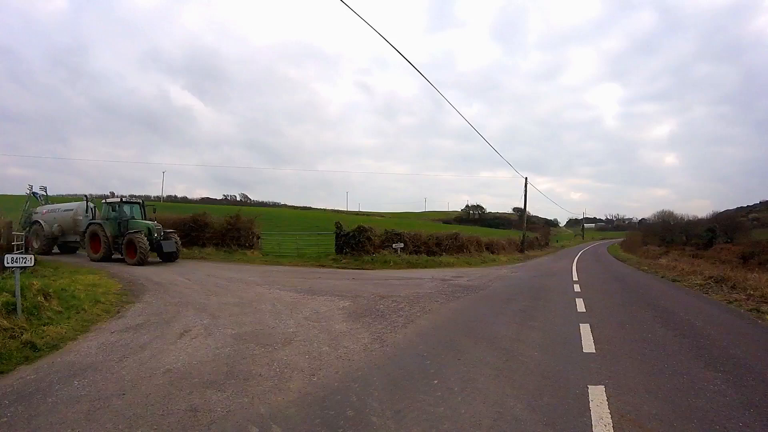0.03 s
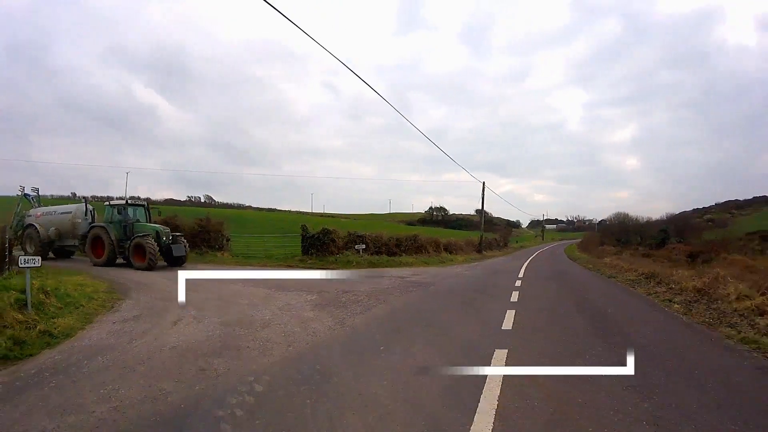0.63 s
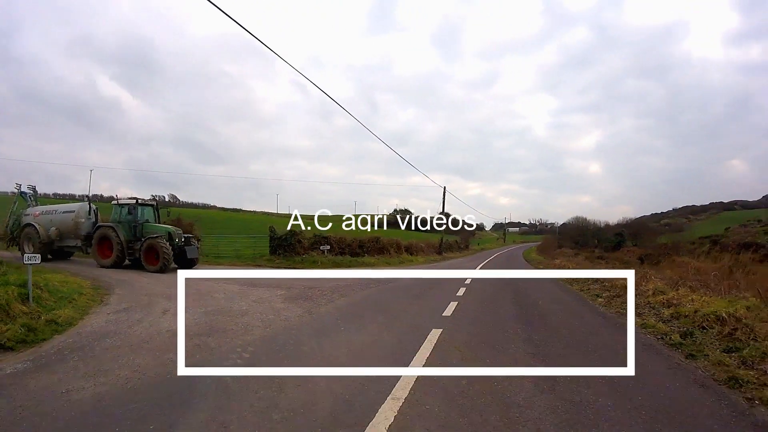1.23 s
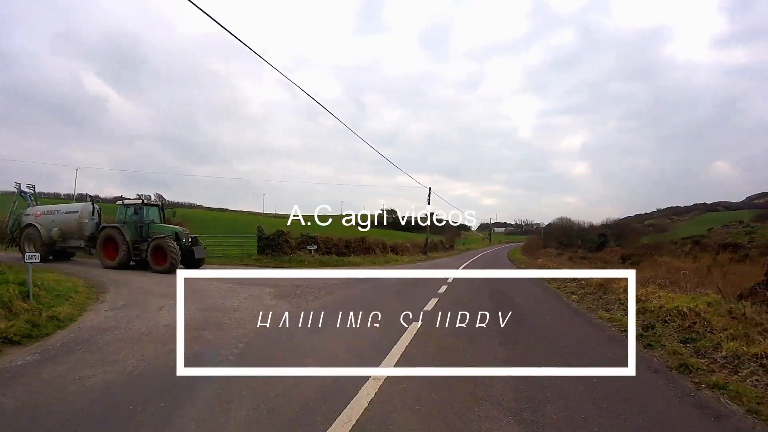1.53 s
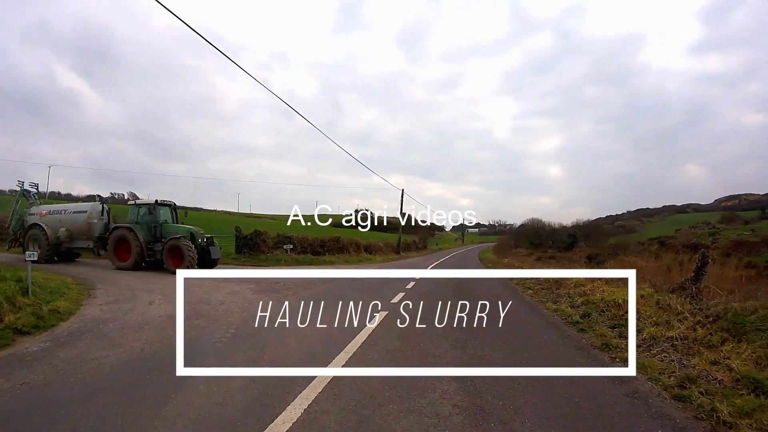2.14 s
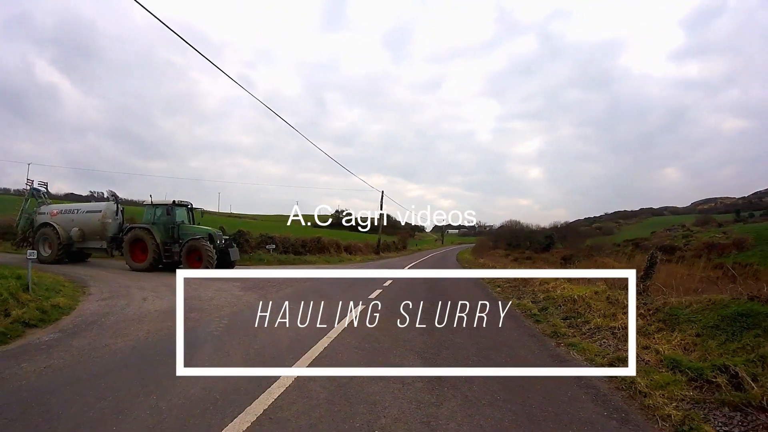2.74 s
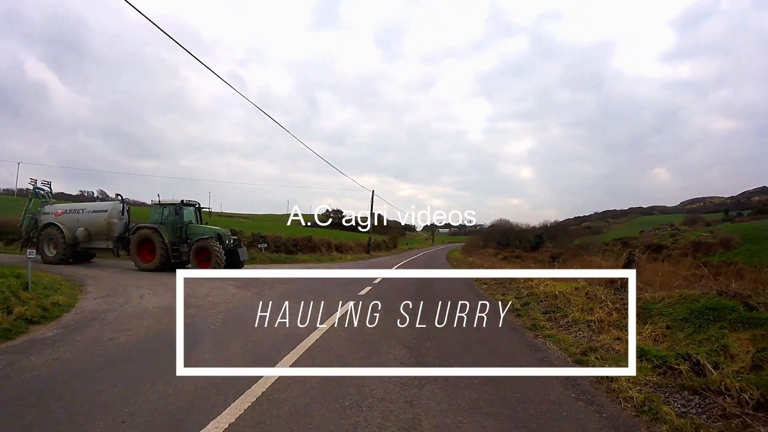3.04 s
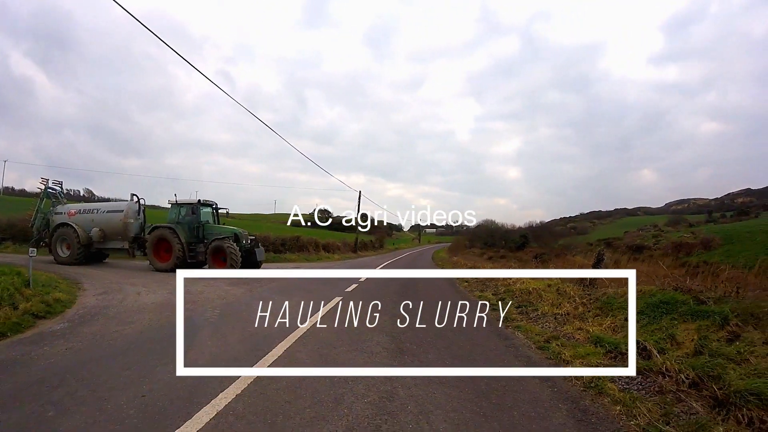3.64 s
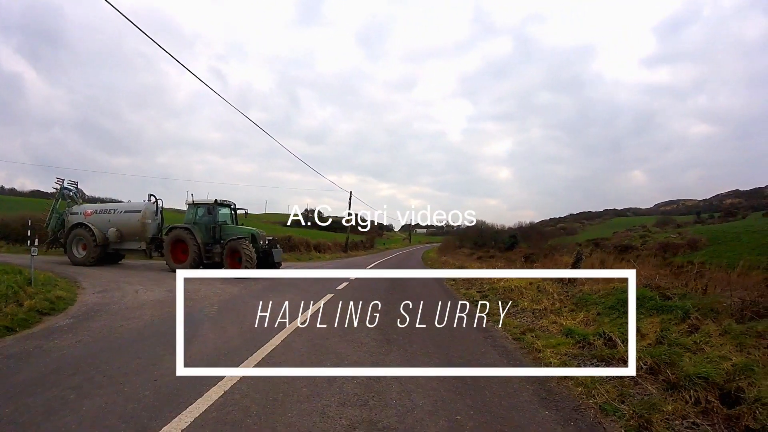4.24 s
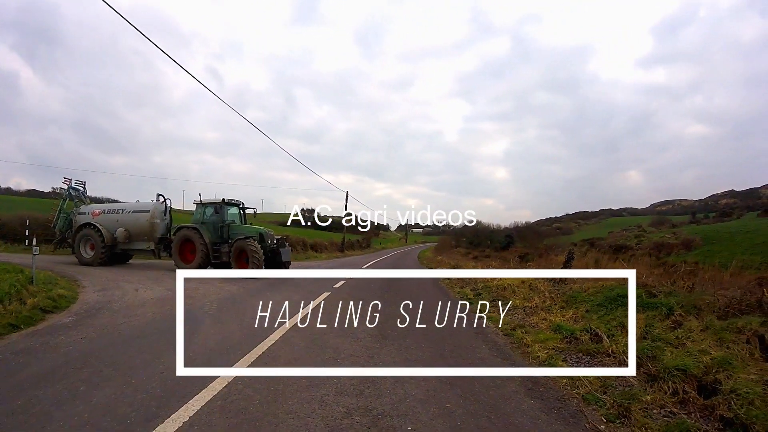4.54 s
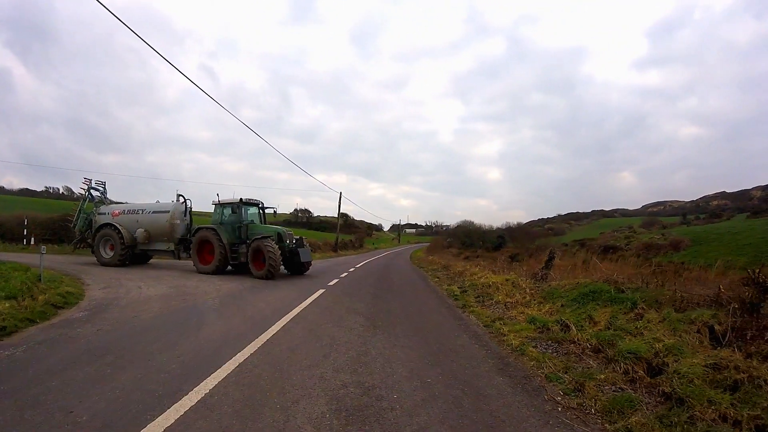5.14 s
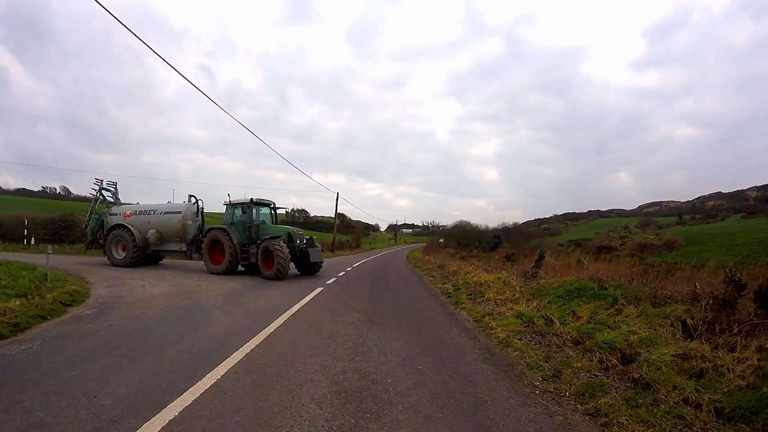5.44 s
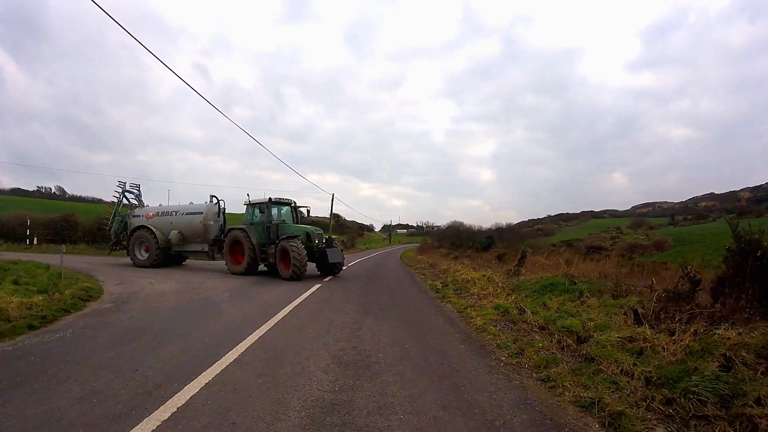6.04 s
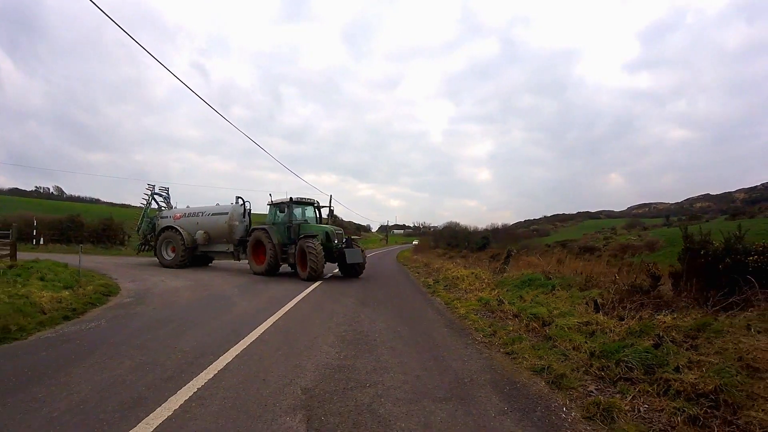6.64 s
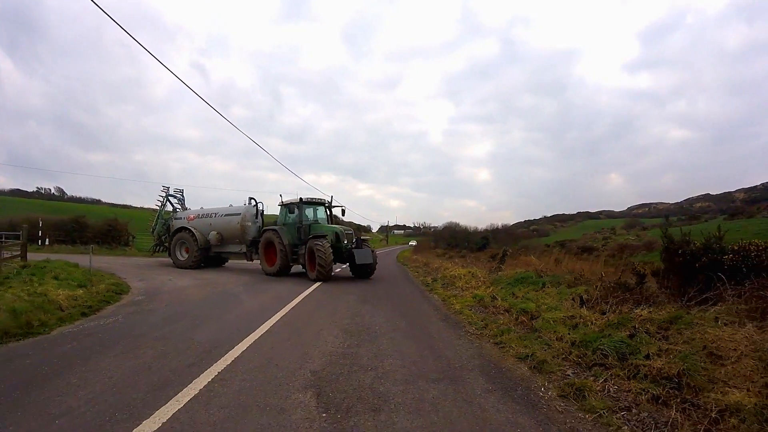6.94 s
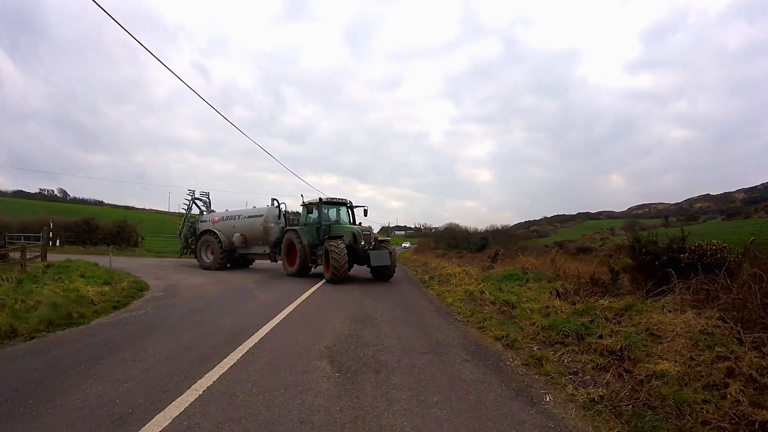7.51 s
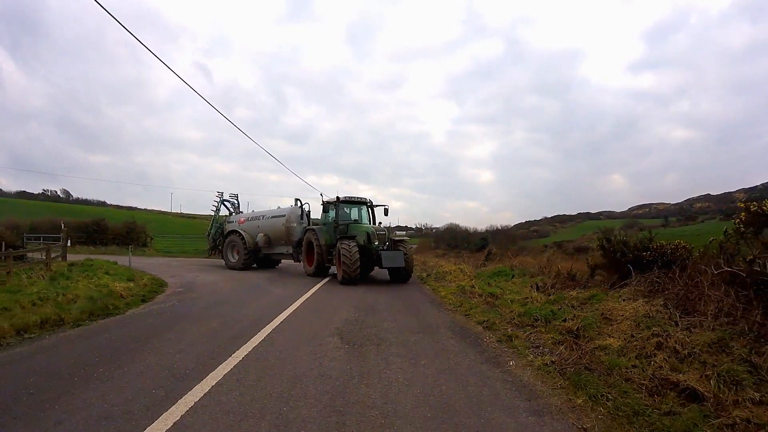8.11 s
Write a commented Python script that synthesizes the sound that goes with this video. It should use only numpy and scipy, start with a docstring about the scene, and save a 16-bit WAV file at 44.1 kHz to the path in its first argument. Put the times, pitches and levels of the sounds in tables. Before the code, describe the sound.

A diesel tractor towing a tank runs near the microphone at a country junction, with low wind buffeting throughout, gustier from about 2 seconds. At first the engine knocks and rumbles over rolling tyres and a hum that sinks in pitch and dies away by 4 seconds. Loose steel fittings clink on the tank from about 0.5 to 4.7 seconds. The tractor is quietest near 3.7 seconds, then takes up the load, with a thin, pulsing turbo whistle that rises around 5 seconds and fades. A sharp, dry knock and a wind boom come at about 5.4 seconds. The engine picks up speed and pulls with a throbbing drone from its panels, while the tyres crunch on grit and crack small stones. Another gust booms near 7 seconds, and the tractor eases slightly in level towards the end, just after 8 seconds.

```python
"""Tractor and tank at a country junction

A diesel tractor towing a tank slows, then pulls out, heard at one nearby microphone.
Its drive hum sinks; firings knock the block, set panels droning and pulse the turbo's whistle.
Tyres roar and crunch on grit, and loose steel fittings clink on the tank.
Closest of all, wind buffets the microphone throughout."""
import sys
import numpy as np
from scipy import signal
from scipy.fft import rfft, irfft, next_fast_len
from scipy.io import wavfile
from scipy.ndimage import uniform_filter1d, minimum_filter1d

SR = 44100
rng = np.random.default_rng(int(sys.argv[2]) if len(sys.argv) > 2 else 0)


def digitize_waveform(pressure):
    """Quantize a signal to 16-bit integers and store it at the path in sys.argv[1].

    Rows of a 2-D input are taken as channels; values are limited to [-1, 1].
    """
    field = np.atleast_2d(pressure).T
    bounded = np.clip(field, -1, 1)
    quanta = np.round(bounded * 32767).astype(np.int16)
    wavfile.write(sys.argv[1], SR, quanta)


N = 364707
TIME = np.arange(N) / SR

# how loud the rig is at the microphone: (time [s], level [dB])
RIG_LEVEL = [(0.1, -32.5), (1.9, -33), (2.5, -34.5), (2.7, -37.5), (3.4, -36.5), (3.66, -38), (3.71, -44.5),
             (3.92, -38.5), (4.3, -34), (4.75, -30.5), (4.95, -35.5), (5.35, -32.5), (6.4, -29.5),
             (6.8, -31.5), (7.7, -33.5), (8.25, -36)]
# the engine slowing and picking up: (time [s], firing rate [Hz], load [0-1])
ENGINE_RUN = [(0, 39.76, 0.37), (1.6, 37.84, 0.25), (2.8, 35.27, 0.41), (3.7, 33.67, 0.28),
              (4.1, 33.28, 0.7), (4.4, 32.27, 1), (4.9, 33.7, 0), (5.15, 35.69, 0.9), (5.45, 37.96, 0.6),
              (5.75, 40.02, 0.8), (6.25, 40.61, 0.85), (6.9, 40.16, 0.66), (8.27, 40.34, 0.85)]
# resonances of block, injectors and valves, and fittings: (frequency [Hz], width [Hz], gain [dB])
BLOCK_MODES = [(351, 41, -3.5), (692, 60, -4), (760, 250, -18.5), (978, 230, -8.5), (1119, 18, -3),
               (1220, 35, -0.5), (1438, 300, -7)]
VALVE_MODES = [(2850, 180, 1), (3680, 490, -0.5), (4930, 180, -3), (7000, 270, -18)]
STEEL_MODES = [(3795, 45, 0), (4140, 100, -5.5), (5830, 170, -4), (6200, 270, -7), (6740, 110, -0.5),
               (7700, 480, -7.5), (9050, 280, -9), (11700, 2200, -9.5)]
# exhaust note, and tones of the pulling engine: (multiple of firing rate [ratio], relative level [dB])
EXHAUST_TONES = [(2, -26.5), (3, -29.5), (4, -37), (5, -40.5), (6, -40.5), (7, -44), (8, -48), (9, -46),
                 (11, -48), (17, -60.5)]
PULL_TONES = [(7, -19.5), (24, -4.5), (27, -16), (32, -3)]
# the silencer's two strongest surges: (time [s], length [s], level [dB])
SILENCER_SURGES = [(6.004, 0.046, -40), (6.828, 0.04, -31)]
# turbo whistle and drive-line hum: (time [s], frequency [Hz], level [dB])
TURBO_WHISTLE = [(3.45, 3660, -67), (3.7, 3590, -65.5), (4.05, 3558, -60), (4.35, 3606, -51),
                 (4.6, 3600, -48), (4.87, 3680, -51.5), (5.02, 3840, -60), (5.2, 4040, -57),
                 (5.42, 4170, -49), (5.56, 4350, -60), (6.7, 5450, -70), (7.1, 5500, -68),
                 (7.65, 5490, -64), (8.0, 5500, -68)]
DRIVE_HUM = [(0, 216.4, -28), (1.25, 209.5, -28.5), (1.55, 205, -26), (2.45, 202.5, -25), (2.8, 189, -40),
             (3.2, 178.6, -29), (3.9, 174, -55)]
# tones of that hum: (multiple of hum frequency [ratio], relative level [dB])
HUM_TONES = [(0.125, 2), (.25, 2), (0.563, -13.5), (.76, -19), (1, -1.5)]
# road speed, as the tyre lugs meet the road: (time [s], lug rate [Hz])
LUG_RATE = [(0, 560), (2.05, 426.5), (3.25, 348), (3.9, 323.5), (5.2, 312.4), (6.2, 342.3), (8.27, 352)]
# swells of the lugs' tone: (time [s], length [s], level [dB])
LUG_SWELLS = [(0.999, 0.83, -42.5), (2.267, 0.98, -39.5), (3.22, 0.28, -38), (6.043, 1.05, -34),
              (7.75, 0.51, -37.5)]
# loose grit under the tyres: (time [s], amount [0-1])
GRIT_COVER = [(3.65, 0.23), (3.72, 0.05), (4.3, 0.27), (5.24, 0.5), (5.32, 0.8), (5.7, 0.89), (6.85, 0.88),
              (7.1, 0.72), (8.27, 0.56)]
# stones cracking under the treads: (time [s], relative crack level [dB], relative spray level [dB])
STONE_CRUSHES = [(5.5864, -35, -46), (5.673, -36, -42.5), (5.77, -41, -52), (5.82, -49, -56),
                 (5.9908, -34, -47), (6.098, -38, -44), (6.139, -31, -51), (6.2159, -32.5, -46),
                 (6.2377, -33, -55), (6.336, -40, -44), (6.3617, -35, -50), (6.4161, -33, -46),
                 (6.464, -43, -49), (6.535, -35, -46), (6.5595, -30, -60), (6.7129, -42, -48),
                 (6.7845, -43, -50), (6.8818, -32, -44), (7.1554, -39, -52), (7.431, -35, -49),
                 (7.553, -41, -53), (7.597, -36, -60), (7.697, -34.5, -50), (7.787, -44, -58),
                 (8.015, -38, -56)]
# the loudest knocks: (time [s], level [dB])
HARD_KNOCKS = [(3.3653, -47), (3.3905, -48), (5.377, -25), (5.4316, -35)]
# fittings clinking on the tank: (time [s], relative chatter level [dB], relative ring level [dB])
TANK_CLINKS = [(0.5302, -49, -60), (0.6075, -45, -58), (0.6853, -45, -61), (0.835, -43, -51),
               (0.9058, -46, -58), (0.9847, -41, -59), (1.0585, -42, -55), (1.412, -42, -49),
               (1.4551, -42, -57), (1.497, -45, -55), (1.5653, -46, -47), (1.6467, -42, -46),
               (1.6801, -41, -45), (1.7364, -43, -53), (1.7704, -41, -53), (1.8297, -42, -50),
               (1.868, -44, -61), (1.9195, -46, -49), (2.0233, -46, -49), (2.048, -45, -44),
               (2.1061, -36, -47), (2.149, -44, -52), (2.5541, -43.5, -65), (2.7, -45, -62),
               (2.8005, -46, -55), (2.9006, -40.5, -55), (2.935, -50, -54), (3.005, -46, -47),
               (3.106, -44, -45), (3.145, -58, -42), (3.5274, -45, -49), (3.5744, -53, -48),
               (3.655, -47, -52), (4.0148, -44, -39), (4.1155, -45, -48), (4.168, -50, -44),
               (4.2293, -45, -45), (4.5945, -42, -45), (4.6846, -41, -51)]
# steady breeze on the microphone: (time [s], buffet level [dB], flutter level [dB])
BREEZE = [(0, -27.5, -28), (.9, -20.5, -28.5), (1.4, -26, -26.5), (2.3, -16.5, -24.5), (3.85, -20, -34.5),
          (4.4, -22, -25.5), (5.15, -13.5, -28.5), (5.8, -16, -24.5), (6.4, -12.5, -21.5), (7.3, -16, -30),
          (8.27, -15, -30)]
# gusts on top of it: (time [s], length [s], buffet level [dB], flutter level [dB])
GUSTS = [(2.013, 0.045, -7, -46), (2.143, 0.037, -1.5, -21), (2.461, .12, -10.5, -19),
         (2.6, 0.18, -10, -42), (2.756, 0.097, -13.5, -42), (2.97, 0.075, -15, -24.5),
         (3.088, 0.16, -11.5, -22.5), (3.347, 0.15, -9, -21.5), (3.472, 0.11, -7, -32),
         (3.655, 0.068, -3, -21), (3.998, 0.083, -6.5, -33), (4.617, 0.089, -13.5, -27),
         (4.76, 0.12, -9, -21.5), (4.895, 0.049, -7.5, -34), (5.424, 0.075, -7, -18),
         (5.699, 0.067, -15, -32), (5.847, 0.079, -13, -19), (6.077, 0.12, -27, -21.5),
         (6.35, 0.09, -15, -25), (6.48, 0.2, -27, -30), (6.677, 0.061, -5.5, -35), (6.788, 0.059, -15, -24),
         (6.907, 0.096, -12, -26), (7.021, 0.085, -6.5, -32), (7.105, 0.07, -10, -20),
         (7.22, 0.048, -17, -38), (7.297, 0.09, -13, -43), (7.479, 0.046, -4.5, -23.5),
         (7.701, 0.13, -21, -22.5), (7.813, 0.07, -7.5, -23), (7.91, 0.061, -22, -21.5),
         (8.014, 0.047, -8, -36), (8.099, 0.095, -8.5, -44), (8.25, 0.063, -15, -23)]
# gusts that hit the microphone opening squarely: (time [s], length [s], level [dB])
WIND_BOOMS = [(5.424, 0.16, -16.5), (7.14, 0.14, -13)]
# spectra of the noises as they reach the microphone: (frequency [Hz], relative density [dB])
ENGINE_KNOCK_SPECTRUM = [(150, -4), (300, 8.5), (520, -2), (800, 1), (1300, 11), (1550, -0.5),
                         (1950, -14.5), (2800, -14), (4000, -29), (7000, -57), (12000, -49.5)]
TYRE_SPECTRUM = [(200, -4.5), (300, 0), (430, -1), (570, -8), (720, -3.5), (900, -5.5), (1200, -1),
                 (1500, -13), (1900, -21), (2600, -31), (3900, -34.5), (5000, -53), (9000, -54)]
GRIT_CRUNCH_SPECTRUM = [(1500, -17), (2600, -2.5), (3300, 1), (3850, 6.5), (4500, -2.5), (5200, -5),
                        (6000, -1), (6800, -2), (7600, -15), (9500, -12.5), (14000, -50.5)]
GRIT_SPRAY_SPECTRUM = [(5000, -8.5), (7600, -1.5), (9200, -4.5), (10700, -1.5), (12500, 1), (13500, -6),
                       (14500, -14.5)]
STONE_SPECTRUM = [(1200, -16.5), (2200, -3), (3100, -5), (3900, 7.5), (4800, -3.5), (6500, -11.5),
                  (8000, -24.5), (13000, -27)]
HARD_KNOCK_SPECTRUM = [(300, -7), (700, -3), (1400, -2), (2300, 10.5), (3100, 1), (3850, 3.5), (4800, -0.5),
                       (6500, -1), (8000, -14), (12500, -30), (15000, -46)]
WIND_BUFFET_SPECTRUM = [(8, -10), (18, 13), (32, 3.5), (50, 1), (80, -11), (120, -18), (250, -55.5)]
WIND_FLUTTER_SPECTRUM = [(40, -19.5), (80, 0.5), (120, 2), (180, -5.5), (280, -11.5), (420, -22),
                         (800, -27.5), (2000, -49), (5000, -63.5)]


def engine(turns, load, level_db):
    """Each firing knocks the block, over valve ticks and the exhaust note; turns counts the firings."""
    # much of the clatter repeats every second firing
    pattern = rng.standard_normal(2400)[(turns / 2 % 1 * 2400).astype(int)]
    blows = (.72 + burst(turns, fade=.63)) * undb(2.36 * drift(35) + 1.2 * load * throb(turns))
    shake = blows * (noise() + .8 * pattern)
    ring = signal.sosfilt(signal.butter(6, 1650, fs=SR, output="sos"), resonate(shake, BLOCK_MODES))
    taps = burst(turns, fade=.42) * undb(2.6 * drift(40)) * noise()
    ticks = resonate(resonate(taps, VALVE_MODES), VALVE_MODES) * np.interp(TIME, [4, 7], [.3, 1])
    clatter = undb(-4.5) * colour(shake, ENGINE_KNOCK_SPECTRUM) + undb(-1.5) * ring + undb(-21.5) * ticks
    uneven_turns = turns + .008 * drift(12)
    exhaust = sum(undb(db + 2 * drift(9.3)) * sine(k * uneven_turns + rng.random())
                  for k, db in EXHAUST_TONES)
    return np.sqrt(load) * (undb(level_db) * clatter + exhaust)


def engine_pull(turns):
    """Pulling away, the firings repeat closely enough to sing, over the silencer's surging drone."""
    tones = sum(undb(db + 2 * drift(9)) * sine(k * turns + .12 * drift(14) + rng.random())
                for k, db in PULL_TONES)
    silencer = wavering(hz=341, wander=.03, rate=40) * unit(.6 + burst(turns, fade=.3))
    surging = np.abs(wavering(hz=4.2, wander=.25, rate=5))
    pulling = swell(s=6.7, length=2.5, db=-40.5)
    return (tones + surging * silencer) * pulling + silencer * swells(SILENCER_SURGES)


def panel_drone(turns):
    """Firings kick the panels: a side panel buzzes at the lowest revs, then bonnet and cab throb."""
    kicks = unit(.3 + burst(turns, fade=.3))
    side = narrow_noise(hz=1385, width=93) * swell(s=4.35, length=.42, db=-40.5)
    cab = wavering(hz=697, wander=.018, rate=40) * unit(undb(9 * throb(turns)))
    cab *= swell(s=6.6, length=3.1, db=-42)
    bonnet = wavering(hz=1297, wander=.009, rate=50) * unit(undb(4.5 * throb(turns) + 2 * drift(25)))
    bonnet *= swell(s=5.77, length=1.5, db=-36.5)
    return kicks * (bonnet + cab + side)


def turbo(turns):
    """A rough whistle pulses with every exhaust puff, climbing and steadying as the turbo spools up."""
    hz, db = curves(TURBO_WHISTLE)
    boost = (hz - hz.min()) / np.ptp(hz)
    whistle = wavering(hz, wander=.019, rate=450)
    puffs = np.cos(np.pi * (turns + .1 * drift(20))) ** 6
    flow = unit((.2 + .6 * boost + puffs) * undb(3 * drift(70)))
    return whistle * flow * undb(db)


def drive_hum():
    """The drive line hums over a low throb; both sink and die away as the rig slows."""
    hz, db = curves(DRIVE_HUM)
    turns = turns_of(hz * (1 + .004 * drift(20)))
    hum = sum(undb(tone_db + drift(10)) * sine(k * turns + rng.random()) for k, tone_db in HUM_TONES)
    return hum * undb(db) * np.interp(TIME, [3.7, 4.2], [1, 0])


def tyre_roar(load, level_db):
    """The rolling roar gives way to the engine as the load rises."""
    roar = colour(noise(), TYRE_SPECTRUM) * undb(level_db + .38 * drift(14))
    return roar * np.sqrt(1 - .7 * load)


def tyre_lugs():
    """Tread bars slap the road, each a little differently."""
    lug_hz, = curves(LUG_RATE)
    slaps = sine(turns_of(lug_hz) + .17 * drift(35)) * undb(2.5 * drift(30))
    return unit(slaps) * swells(LUG_SWELLS)


def grit(cover, rig_db):
    """Stones crack under the lugs in bunches and shed a fine spray in flurries."""
    swing_db = .53 * (rig_db - np.mean(rig_db))  # partly follows the rig's level at the microphone
    crunch_db = swing_db - 61 + 7.5 * cover
    spray_db = swing_db - 83 + 26 * cover
    bunches = undb(2.6 * drift(14))
    cracks = crackle(per_s=300, spread_db=5.5, t60=.012)
    crunch = colour((cover * cracks * bunches + 1) * noise(), GRIT_CRUNCH_SPECTRUM)
    flurries = unit(undb(2.5 * drift(18)))
    splinters = crackle(per_s=450, spread_db=5.5, t60=.01)
    spray = colour((splinters + .99 * cracks) * noise(), GRIT_SPRAY_SPECTRUM)
    shed = strikes([(s, db - 5) for s, _, db in STONE_CRUSHES], t60=.22)
    return crunch * undb(crunch_db) + spray * np.hypot(undb(spray_db) * flurries, shed)


def knocks_and_stones(cover):
    """Broad, dry knocks and the crisp ticks of stones flicked or crushed by the treads."""
    flicked = cover ** 2 * strikes(scattered(per_s=14, db=-48, scatter_db=3), t60=.022)
    crushed = strikes([(s, db - 3) for s, db, _ in STONE_CRUSHES], t60=.022)
    knocks = strikes(HARD_KNOCKS, t60=.035) * colour(noise(), HARD_KNOCK_SPECTRUM)
    return knocks + (flicked + crushed) * colour(noise(), STONE_SPECTRUM)


def tank_fittings(rig_db):
    """Loose steel jingles and clinks in a shifting mix of modes; after a clink the lowest rings on."""
    jingle = strikes(scattered(per_s=23, db=-26.5, scatter_db=7.5), t60=.07) * undb(rig_db)
    hold_s, t60 = .0092, .088  # each clink chatters for a moment, then fades
    contact = np.zeros(N)
    for s, chatter_db, _ in TANK_CLINKS:
        during = slice(int(s * SR), int((s + .5) * SR))
        fading_s = np.maximum(TIME[during] - s - hold_s, 0)
        contact[during] += undb(chatter_db - 9 - 60 * fading_s / t60)
    lowest_mode = wavering(STEEL_MODES[0][0], wander=.022, rate=350)
    ring = lowest_mode * strikes([(s, db - 6.5) for s, _, db in TANK_CLINKS], t60=.12)
    modes = unit(sum(undb(db + 3 * drift(17)) * narrow_noise(hz, 2 * width)
                     for hz, width, db in STEEL_MODES))
    scrape = colour(noise(), GRIT_CRUNCH_SPECTRUM)
    chatter = unit(undb(3 * drift(260)))
    return ring + (jingle + contact) * chatter * (undb(-6.5) * modes + undb(-5) * scrape)


def wind():
    """Right on the microphone, big eddies thump, small ones flutter on their crests and gusts boom."""
    buffet_gain, flutter_gain = undb(curves(BREEZE))
    for s, length, buffet_db, flutter_db in GUSTS:
        buffet_gain = np.hypot(buffet_gain, swell(s, length, buffet_db))
        flutter_gain = np.hypot(flutter_gain, swell(s, length, flutter_db))
    eddies = colour(noise(), WIND_BUFFET_SPECTRUM)
    # evened out, so that breeze and gusts set their strength
    eddies /= np.sqrt(uniform_filter1d(eddies ** 2, size=3500) + .01)
    flutter = colour(noise(), WIND_FLUTTER_SPECTRUM) * unit(1 + .95 * np.abs(eddies))
    boom = narrow_noise(hz=85.7, width=45) * swells(WIND_BOOMS)
    return eddies * buffet_gain + flutter * flutter_gain + boom


def throb(turns, firings=6, crest_s=6.87):
    """The engine's slow beat, one in several firings, from -1 to 1."""
    return np.cos(2 * np.pi * (turns - np.interp(crest_s, TIME, turns)) / firings)


def burst(turns, fade):
    """A quick rise and slower fall once a cycle; rms 1."""
    phase = turns % 1
    return unit(np.exp(-phase / fade) - np.exp(-phase / .029))


def swell(s, length, db):
    """A smooth rise and fall round time s, above half height for the given length."""
    return undb(db) * .5 ** np.minimum((2 * (TIME - s) / length) ** 2, 60)


def swells(rows):
    """Sum of (time [s], length [s], level [dB]) swells."""
    return sum(swell(*row) for row in rows)


def scattered(per_s, db, scatter_db):
    """Blows at loose, random moments: (time [s], level [dB])."""
    chance = rng.random((200, 2))[:int(per_s * N / SR)]
    return [((k + when) / per_s, db + scatter_db * (2 * size - 1))
            for k, (when, size) in enumerate(chance)]


def strikes(rows, t60):
    """Envelope of (time [s], level [dB]) blows that all die away alike."""
    hits = np.zeros(N)
    for s, db in rows:
        hits[int(s * SR) % N] += undb(db)
    return ring_out(hits + 1e-18, t60)


def crackle(per_s, spread_db, t60):
    """Envelope of random impacts of widely varying size, adding in power; rms 1."""
    hits = (rng.random(N) < per_s / SR) * np.sign(noise())
    sizes = undb(spread_db * np.clip(noise(), -2, 2))
    return unit(np.sqrt(ring_out((hits * sizes) ** 2, t60)))


def ring_out(hits, t60):
    """Let every impulse fall by 60 dB in t60 seconds."""
    return signal.lfilter([1], [1, -np.exp(-np.log(1000) / (t60 * SR))], hits)


def colour(x, points):
    """Causal filter through (frequency [Hz], gain [dB]) points; the result has rms 1."""
    hz, db = np.transpose(points)
    size = next_fast_len(N + SR // 2) // 2 * 2
    freqs = np.maximum(np.fft.rfftfreq(size, 1 / SR), 1)
    # the spectrum falls away beyond its end points
    log_hz = np.log(np.r_[hz[0] / 2, hz, hz[-1] * 4])
    gain_db = np.interp(np.log(freqs), log_hz, np.r_[db[0] - 20, db, db[-1] - 60])
    # folding the cepstrum gives minimum phase
    cepstrum = irfft(np.log(undb(gain_db)))
    cepstrum[1:size // 2] *= 2
    cepstrum[size // 2 + 1:] = 0
    return unit(irfft(rfft(x, size) * np.exp(rfft(cepstrum)), size)[:N])


def resonate(x, modes):
    """Sum of (frequency [Hz], width [Hz], gain [dB]) resonances; the result has rms 1."""
    return unit(sum(undb(db) * signal.lfilter(*signal.iirpeak(hz, hz / width, fs=SR), x)
                    for hz, width, db in modes))


def wavering(hz, wander, rate):
    """A tone whose pitch wanders by the given share, rate times a second; rms 1."""
    return unit(sine(turns_of(hz * (1 + wander * drift(rate)))))


def narrow_noise(hz, width):
    """Noise in a narrow band round hz; rms 1."""
    angle = 2 * np.pi * turns_of(np.full(N, hz))
    return unit(drift(width) * np.cos(angle) + drift(width) * np.sin(angle))


def drift(rate):
    """Smooth random drift with about rate changes a second; rms 1."""
    steps = uniform_filter1d(np.repeat(rng.standard_normal(int(rate * N / SR) + 2), 4), 4)
    return unit(np.interp(TIME * rate * 4, np.arange(len(steps)), steps))


def noise():
    """White noise."""
    return rng.standard_normal(N)


def curves(table):
    """Each column after the time, joined by straight lines."""
    s, *columns = np.transpose(table)
    return [np.interp(TIME, s, column) for column in columns]


def turns_of(hz):
    """Cycles completed at a changing frequency."""
    return np.cumsum(hz) / SR


def sine(turns):
    """Sine of a phase in cycles."""
    return np.sin(2 * np.pi * turns)


def unit(x):
    """Scale to rms 1."""
    return x / np.sqrt(np.mean(x ** 2))


def undb(db):
    """Decibels to gain."""
    return 10 ** (np.asarray(db) / 20)


def scene():
    """Engine, running gear and wind at one nearby microphone."""
    firing_hz, load = curves(ENGINE_RUN)
    rig_db, = curves(RIG_LEVEL)
    cover, = curves(GRIT_COVER)
    turns = turns_of(firing_hz)
    motor = engine(turns, load, rig_db - 1) + engine_pull(turns) + panel_drone(turns) + turbo(turns)
    wheels = tyre_lugs() + tyre_roar(load, rig_db + .5) + grit(cover, rig_db)
    mix = motor + wheels + drive_hum() + wind() + tank_fittings(rig_db) + knocks_and_stones(cover)
    return mix[None]


def record(dry):
    """The sound opens after a moment and cuts out for an instant; peaks are held, the top is cut."""
    open_s, gap_from_s, gap_to_s = .06, 7.18, 7.1953
    ceiling, top_hz = .9, 14900
    peak = np.maximum(np.abs(dry), ceiling)
    limiter_gain = uniform_filter1d(minimum_filter1d(ceiling / peak, size=600), size=600)
    audible = (TIME > open_s) & ((TIME < gap_from_s) | (TIME > gap_to_s))
    gate = uniform_filter1d(audible.astype(float), size=24)
    lowpass = signal.ellip(8, .2, 70, top_hz, fs=SR, output="sos")
    return signal.sosfilt(lowpass, dry * limiter_gain * gate)


dry = scene()
out = record(dry)
digitize_waveform(out)
```